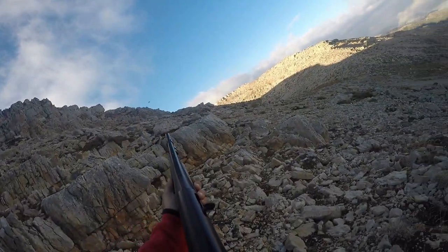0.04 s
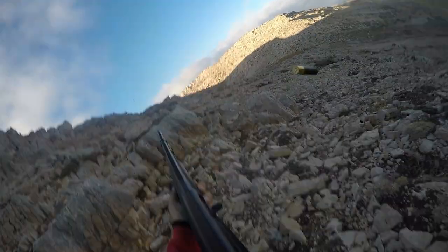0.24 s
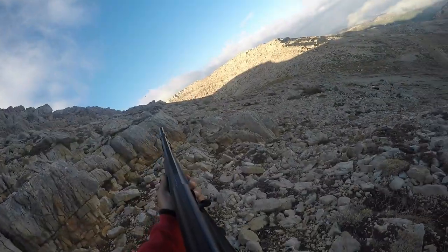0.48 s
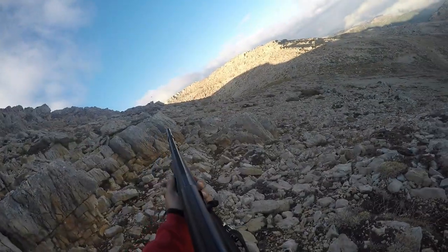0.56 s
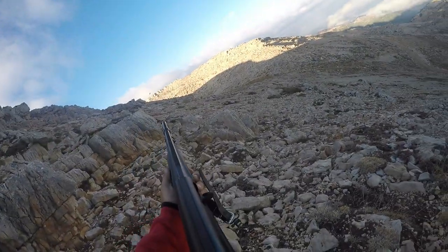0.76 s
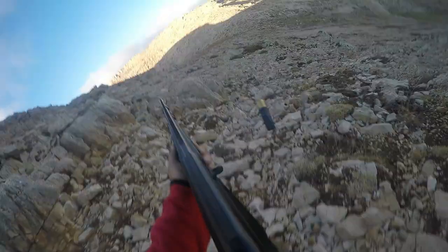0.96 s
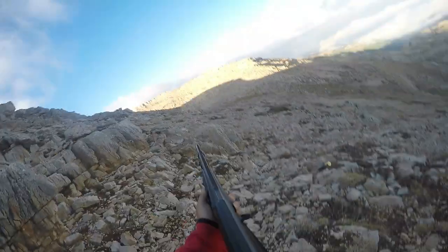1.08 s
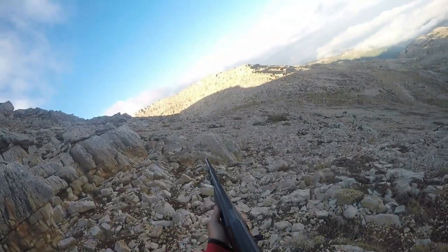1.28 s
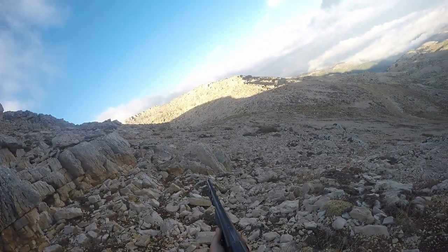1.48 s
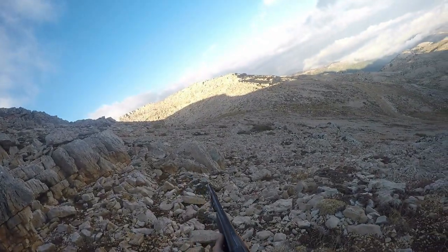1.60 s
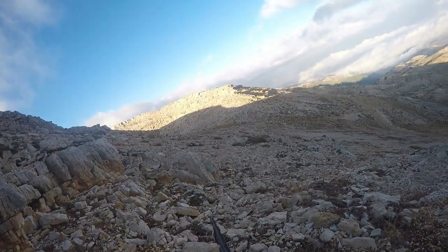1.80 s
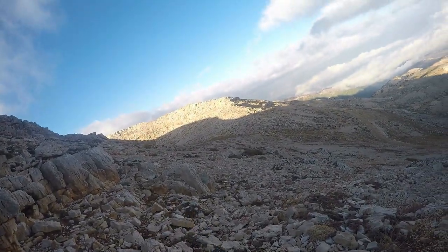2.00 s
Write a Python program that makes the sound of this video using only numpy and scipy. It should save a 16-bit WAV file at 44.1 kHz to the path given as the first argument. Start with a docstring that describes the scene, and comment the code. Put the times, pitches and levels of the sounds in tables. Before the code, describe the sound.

Two sharp shotgun shots with faint hillside echoes and small metallic clicks.

```python
"""A stony hillside: two shotgun shots, heard from a camera worn by the shooter.
Each muzzle blast, a pressure pulse and a roar of gas, overloads the microphone, scatters off
nearby rocks and rolls back faintly from the slopes. Recoil jolts the camera on its mount,
the gun's steel action and loose stones click, and a light wind rises at the end."""
import sys
import numpy as np
from scipy import signal
from scipy.fft import rfft, irfft, next_fast_len
from scipy.io import wavfile
from scipy.ndimage import map_coordinates

SR = 44100
rng = np.random.default_rng(int(sys.argv[2]) if len(sys.argv) > 2 else 0)


def generate_wav(sig):
    """Save sig (samples, or channels by samples) to the path in sys.argv[1] as 16-bit PCM at SR."""
    pcm = np.round(np.clip(np.atleast_2d(sig).T, -1, 1) * 32767).astype(np.int16)
    wavfile.write(sys.argv[1], SR, pcm)


N = 90404


def amp(db):
    return 10 ** (np.asarray(db) / 20)


def colour_gain(colour, hz):
    """Gain from (Hz, dB) points on a log frequency axis."""
    points_hz, points_db = np.transpose(colour)
    return amp(np.interp(np.log(hz + 1), np.log(points_hz + 1), points_db))


def since(start_s):
    return np.arange(N) / SR - start_s


def filtered(x, response):
    size = next_fast_len(N + SR // 2)
    return irfft(rfft(x, size) * response(np.fft.rfftfreq(size, 1 / SR)), size)[:N]


def noise(colour):
    """Coloured noise of rms 1."""
    x = filtered(rng.standard_normal(N), lambda hz: colour_gain(colour, hz))
    return x / np.sqrt(np.mean(x ** 2) + 1e-20)


def wobble(knots_per_s):
    """Smooth random curve."""
    knots = rng.standard_normal(N // 8)
    return map_coordinates(knots, [np.arange(N) * knots_per_s / SR], mode='wrap')


def burst(start_s, hold_s, t60_s):
    """Envelope: sudden start, hold, exponential release."""
    t = since(start_s)
    return (t >= 0) * np.exp(-np.log(1000) * np.maximum(t - hold_s, 0) / t60_s)


def crack(start_s, hold_s, t60_s, colour, pitch_ratio=1):
    """Short noise burst with a smooth spectrum, rms near 1 during the hold."""
    envelope = burst(start_s, hold_s, t60_s)
    size = next_fast_len(N)
    phase = np.angle(rfft(rng.standard_normal(N) * envelope, size))
    gain = colour_gain(colour, np.fft.rfftfreq(size, 1 / SR) / pitch_ratio)
    x = irfft(gain * np.exp(1j * phase), size)[:N] * np.sqrt(envelope)
    return x * np.linalg.norm(envelope) / (np.linalg.norm(x) + 1e-20)


# Wind rumble contour. Each row: time in seconds, level in dB.
RUMBLE_CONTOUR = [(0, -54.5), (0.181, -51.5), (0.499, -53), (.65, -49.5), (.72, -51.5), (.9, -51.5),
                  (1.2, -46), (1.4, -58.5), (1.6, -55), (1.82, -60.5), (1.95, -46), (2.05, -47)]
# Rumble, gust and quiet air spectra. Each row: frequency in Hz, level in dB.
RUMBLE_COLOUR = [(10, -9.5), (22, 5.5), (38, -1.5), (60, -10.5), (110, -29), (170, -41.5), (280, -42.5),
                 (600, -71), (2000, -110)]
GUST_COLOUR = [(40, -3.5), (110, 1.5), (200, -7), (275, -3), (370, -16.5), (1200, -21), (2500, -24),
               (6000, -30), (15000, -45)]
AIR_COLOUR = [(50, 7.5), (200, -2), (500, -2.5), (1200, -7.5), (1650, 0.5), (2700, -4.5), (3400, -8),
              (6000, -13.5), (10000, -17.5), (15000, -27.5)]
def wind():
    """Wind rumbles on the microphone; one gust rises over quiet air."""
    rumble_db = np.interp(since(0), *np.transpose(RUMBLE_CONTOUR))
    rumble = amp(rumble_db) * noise(RUMBLE_COLOUR)
    rise_db_per_s = 36.5
    gust = amp(-67 + rise_db_per_s * since(1.962)) * noise(GUST_COLOUR)
    air = amp(-78.5) * noise(AIR_COLOUR)
    return rumble + gust + air


# Action and loose stone contacts. Each row: start in seconds, level in dB, pitch ratio.
CONTACTS = [(0.2037, -50, 0.95), (0.3392, -36.5, 1.01), (0.3420, -34.5, 1.06), (0.4296, -47, 0.98),
            (0.908, -56, 0.8), (0.931, -47, 1.26), (1.0674, -32.5, 1), (1.0701, -30, .8),
            (1.1514, -51.5, 1.03), (1.1887, -55, .85), (1.4813, -67.5, .8), (1.5025, -73, .8),
            (1.5163, -65.5, 0.96), (1.534, -67, 0.86), (1.5886, -47, 1.17), (1.7426, -70, 1),
            (1.7992, -66, 0.94)]
# Contact spectrum. Each row: frequency in Hz, level in dB.
CONTACT_COLOUR = [(200, -32.5), (1500, -27.5), (2100, -21.5), (2800, -5.5), (4200, 0), (5200, -0.5),
                  (6200, -9), (8200, -6), (10500, -21.5), (15000, -30.5)]
def clicks():
    """Short bright contacts, each with a ring of steel."""
    out = np.zeros(N)
    for start_s, db, pitch_ratio in CONTACTS:
        tick = crack(start_s, hold_s=0.0007, t60_s=0.009, colour=CONTACT_COLOUR, pitch_ratio=pitch_ratio)
        out += amp(db) * (amp(-1.5) * tick + amp(-8.5) * steel_ring(start_s))
    return out


# Modes of the gun's steel. Each row: frequency in Hz, level in dB, T60 in seconds.
STEEL_MODES = [(2600, -3, 0.026), (3550, -8, 0.031), (4050, 0, .03), (5040, -4, .028), (5600, -9.5, .025),
               (7900, -13, .025), (8800, -16.5, .02)]
def steel_ring(start_s):
    """Decaying modes, struck a little differently each time."""
    out = np.zeros(N)
    for hz, db, t60_s in STEEL_MODES:
        strength, phase = rng.random(2)
        tone = np.sin(2 * np.pi * (hz * since(start_s) + phase))
        out += amp(db + 6 * (strength - 1)) * tone * burst(start_s, 0, t60_s)
    return out


# Receiver ring spectrum. Each row: frequency in Hz, level in dB.
IGNITION_COLOUR = [(200, -20), (1200, -10.5), (2200, -3.5), (4400, 0.5), (5500, -6), (7000, -3.5),
                   (15000, -17)]
def ignition(shot_s, lead_s=0.0031):
    """The receiver rings as the cartridge fires, before the blast arrives from the muzzle."""
    return amp(-27) * noise(IGNITION_COLOUR) * burst(shot_s - lead_s, hold_s=lead_s, t60_s=0.011)


# Muzzle gas spectrum. Each row: frequency in Hz, level in dB.
BLAST_COLOUR = [(30, -13), (80, 2.5), (180, 1), (350, -11.5), (600, -9.5), (1150, -14), (1600, -4),
                (2800, -1), (3400, -8.5), (5000, -6), (8000, -18.5), (15000, -26)]
def muzzle_blast(shot_s, positive_phase_s=0.0015):
    """A pressure pulse with a suction tail, plus a short roar of gas."""
    age = np.maximum(since(shot_s), 0) / positive_phase_s
    pulse = (age > 0) * (1 - age) * np.exp(-age)
    roar = crack(shot_s, hold_s=0.0041, t60_s=0.011, colour=BLAST_COLOUR)
    return amp(-1) * pulse + amp(-2.5) * roar


# Rock scatter spectrum. Each row: frequency in Hz, level in dB.
SCATTER_COLOUR = [(25, -23.5), (70, 7.5), (110, 1), (200, -1), (450, -9.5), (800, -9.5), (1150, -14),
                  (1600, -1.5), (3000, -7.5), (5000, -7.5), (7500, -13), (10000, -22), (13500, -26),
                  (16000, -37)]
def rock_scatter(shot_s):
    """Countless small reflections from the stony ground."""
    level_db = -21 + 2.5 * wobble(knots_per_s=700)
    return amp(level_db) * noise(SCATTER_COLOUR) * burst(shot_s, hold_s=0.026, t60_s=0.11)


# Hillside echo contour. Each row: delay in seconds, level in dB.
ECHO_CONTOUR = [(0, -63), (.06, -55), (.1, -51.5), (.16, -54.5), (.235, -60), (.255, -57), (.29, -59),
                (.325, -59), (.35, -68), (.4, -67.5), (.45, -78), (.7, -88.5), (1.2, -120)]
# Echo spectrum before air loss. Each row: frequency in Hz, level in dB.
ECHO_COLOUR = [(40, -27.5), (140, -19.5), (280, -8.5), (420, -13), (800, -6.5), (1250, -6.5), (1650, -3),
               (2700, -0.5), (3500, -7.5), (7000, -12.5), (8500, -20.5), (15000, -28.5)]
def slope_echo(shot_s, fade_db_per_s, loss_db_per_s_at_10khz=29.5):
    """Uneven hillside echo; air absorbs more treble the farther it travels."""
    t = since(shot_s)
    contour_db = np.interp(t, *np.transpose(ECHO_CONTOUR))
    level_db = contour_db - fade_db_per_s * t + 3 * wobble(knots_per_s=160)
    echo = (t > 0) * amp(level_db) * noise(ECHO_COLOUR)
    hz, frame_s, spectra = signal.stft(echo, SR, nperseg=256)
    travel_s = np.maximum(frame_s - shot_s, 0)
    loss_db = loss_db_per_s_at_10khz * (hz[:, None] / 10000) ** 2 * travel_s
    return signal.istft(spectra * amp(-loss_db), SR, nperseg=256)[1][:N]


# Camera jolts. Each row: start in seconds, swing in Hz, level in dB, then rise, hold and T60 in seconds.
CAMERA_JOLTS = [(0.2203, 37, -14, 0.001, 0.024, 0.19), (0.304, 26, -29, 0.0098, 0.014, 0.09),
                (0.336, 32.9, -16.5, 0.025, 0.022, 0.17), (0.9495, 36.6, -13, .003, 0.026, 0.18),
                (1.009, 26.5, -24, 0.017, 0.017, 0.3), (1.088, 35.96, -18, 0.016, 0.012, 0.12)]
# Mount rubbing spectrum. Each row: frequency in Hz, level in dB.
RUB_COLOUR = [(25, -11), (65, 1.5), (85, -5.5), (125, -24), (300, -33.5), (1000, -37), (2500, -69)]
def recoil():
    """The camera swings and rubs on its mount as the gun kicks, and again as the shooter settles."""
    out = np.zeros(N)
    for start_s, hz, db, rise_s, hold_s, t60_s in CAMERA_JOLTS:
        t = since(start_s)
        rub = amp(-18) * noise(RUB_COLOUR)
        swing = -np.sin(2 * np.pi * hz * t)
        envelope = np.clip(t / rise_s, 0, 1) * burst(start_s, rise_s + hold_s, t60_s)
        out += amp(db) * (rub + swing) * envelope
    return out


# Boulder reflections. Each row: arrival in seconds, level in dB.
SLAPS = [(0.2316, -16.5), (0.2596, -28), (0.4645, -48.5), (0.543, -50), (0.9503, -16.5), (0.9845, -22),
         (1.266, -55.5)]
# Reflection spectrum. Each row: frequency in Hz, level in dB.
SLAP_COLOUR = [(100, -8.5), (600, -6.5), (1700, -5.5), (3000, -4.5), (6000, -19), (9000, -35.5),
               (15000, -52)]
def boulder_slaps():
    """Duller reflections from single large rocks."""
    return sum(amp(db) * crack(arrival_s, hold_s=0, t60_s=0.017, colour=SLAP_COLOUR)
               for arrival_s, db in SLAPS)


# Shots. Each row: start in seconds, level in dB, scatter level in dB, extra echo fade in dB per second.
GUNSHOTS = [(0.2142, -3, -2, 0.5), (0.9413, -3, -2, 6.5)]
def scene():
    """All sources, summed to mono."""
    out = wind() + clicks()
    for shot_s, db, scatter_db, fade_db_per_s in GUNSHOTS:
        out += amp(db) * (ignition(shot_s) + muzzle_blast(shot_s))
        out += amp(scatter_db) * rock_scatter(shot_s)
        out += slope_echo(shot_s, fade_db_per_s)
    return (out + recoil() + boulder_slaps())[None]


# Housing resonances. Each row: centre in Hz, width in Hz, level in dB over the direct path.
HOUSING_MODES = [(1542.7, 80, 0.5), (1886, 210, -2.5), (2528, 140, 2), (2857, 88, 4.5), (4225, 150, -6),
                 (4893, 93, 2), (7130, 250, -8.5)]
def housing_response(hz):
    """Direct path plus the ringing of the camera housing."""
    return 1 + sum(amp(db) * 1j * hz * width_hz / (centre_hz ** 2 - hz ** 2 + 1j * hz * width_hz)
                   for centre_hz, width_hz, db in HOUSING_MODES)


def record(dry):
    """The housing colours the sound, the input overloads, a steep low-pass limits the band."""
    ceiling, hardness, cutoff_hz = 0.86, 6, 15400
    coloured = filtered(dry[0], housing_response)
    saturated = coloured / (1 + np.abs(coloured / ceiling) ** hardness) ** (1 / hardness)
    return filtered(saturated, lambda hz: 1 / np.sqrt(1 + (hz / cutoff_hz) ** 120))[None]


dry = scene()
out = record(dry)
generate_wav(out)
```